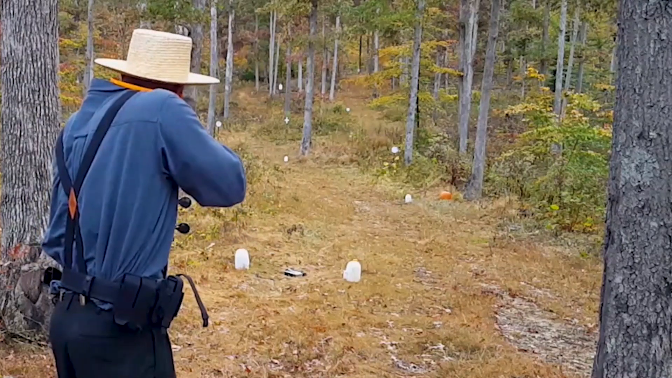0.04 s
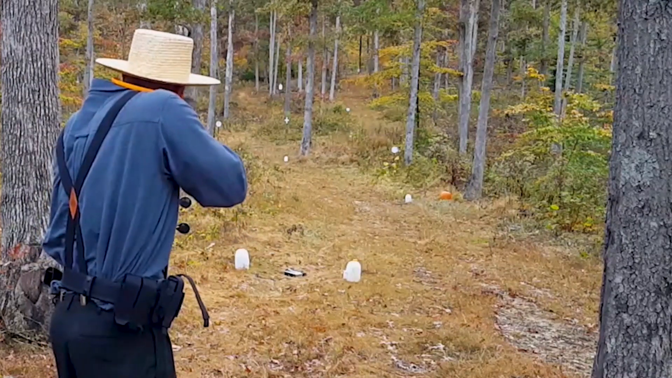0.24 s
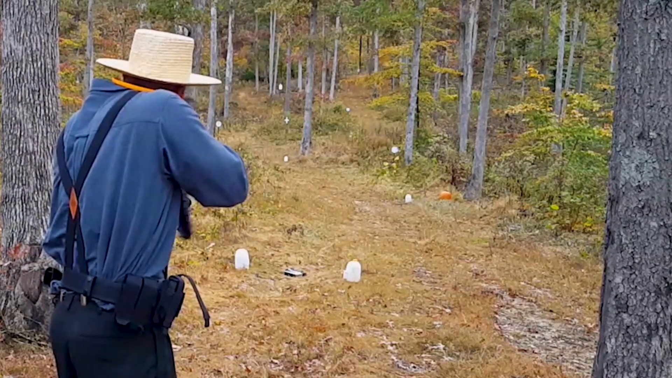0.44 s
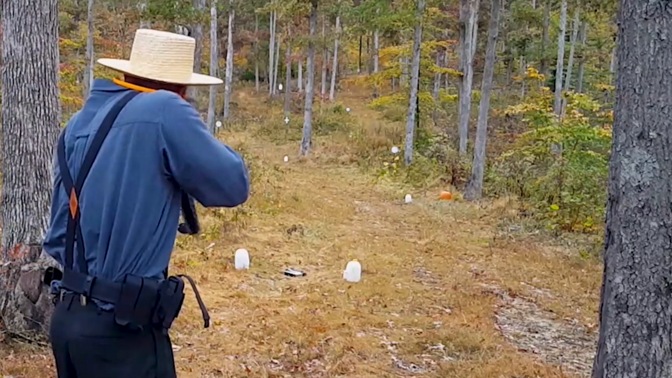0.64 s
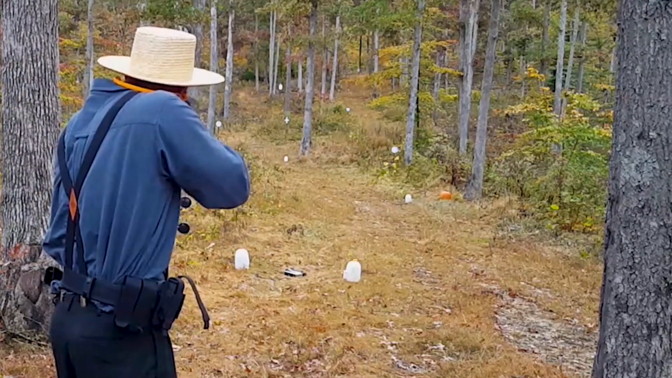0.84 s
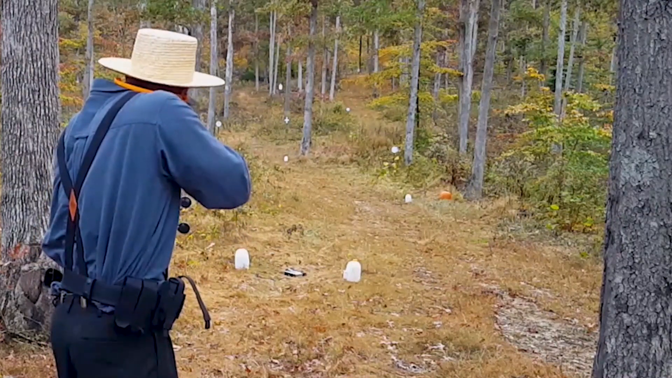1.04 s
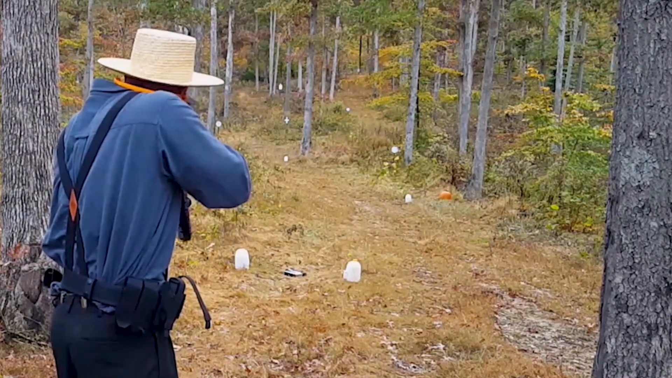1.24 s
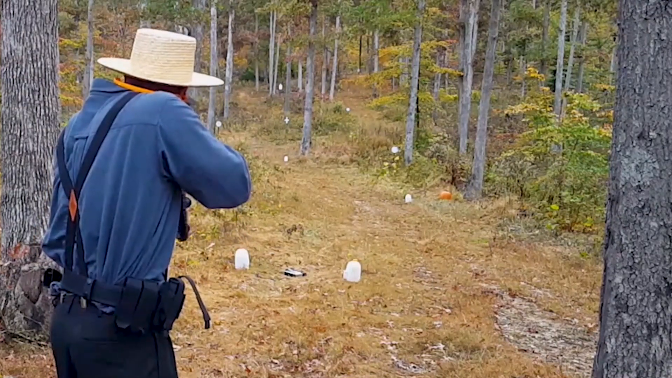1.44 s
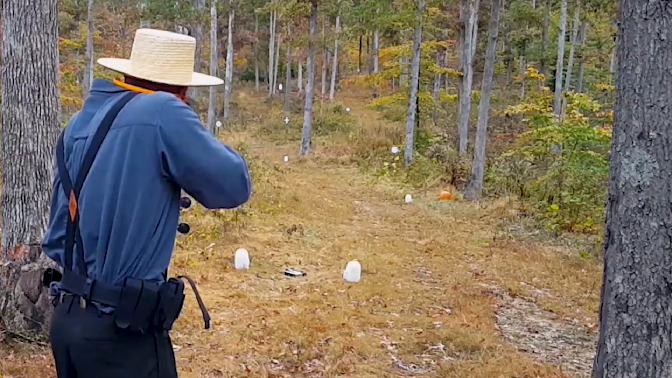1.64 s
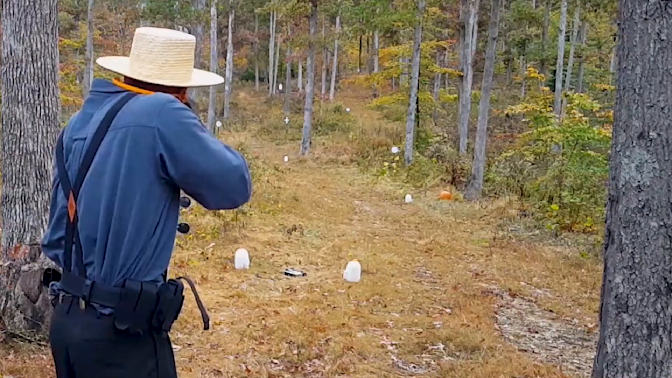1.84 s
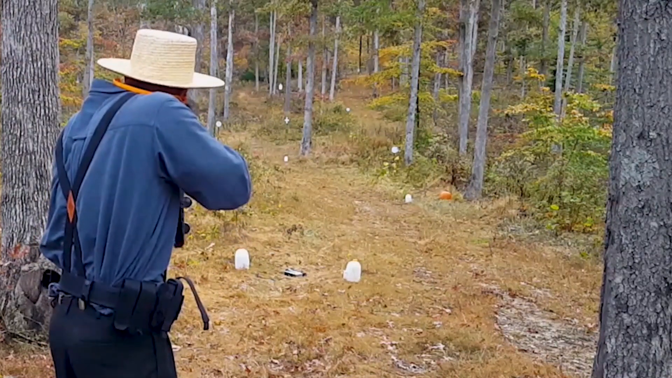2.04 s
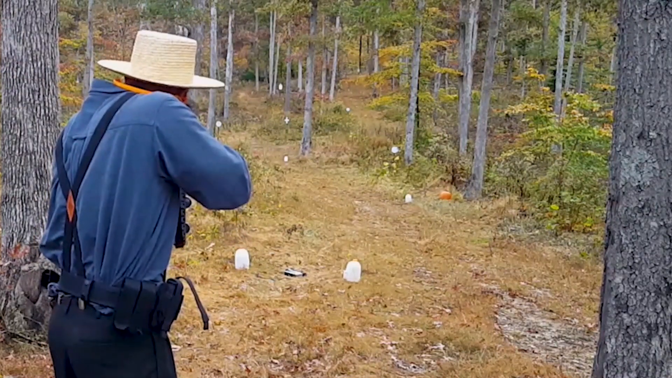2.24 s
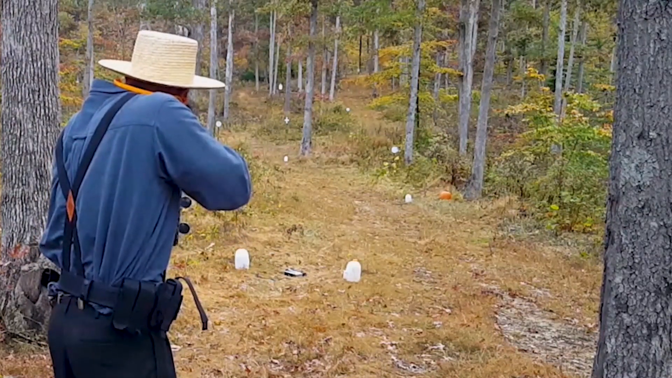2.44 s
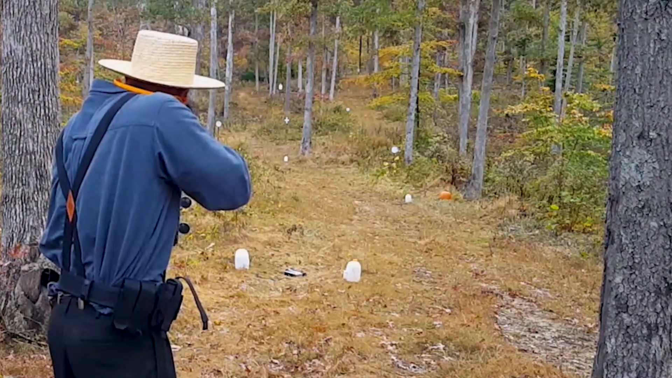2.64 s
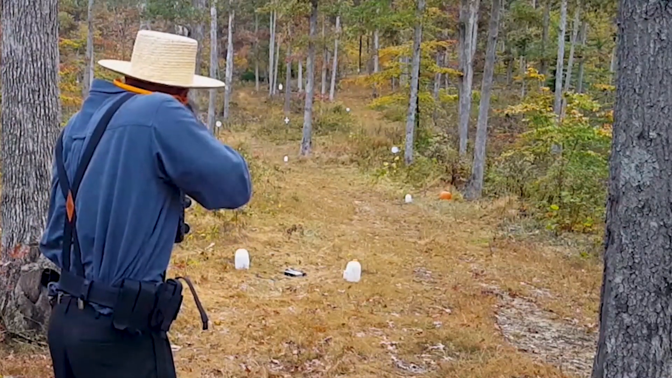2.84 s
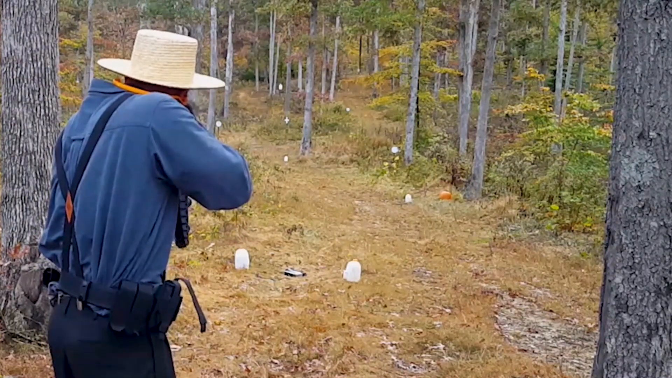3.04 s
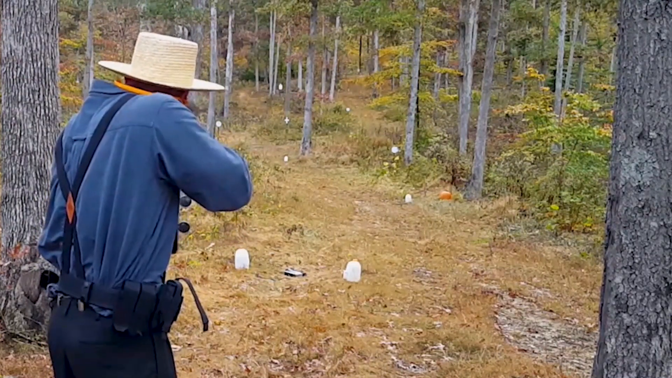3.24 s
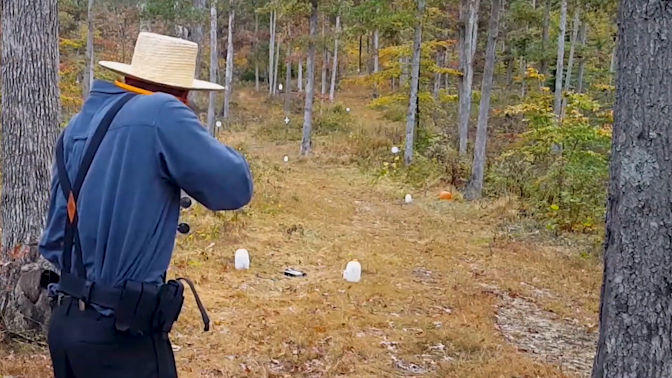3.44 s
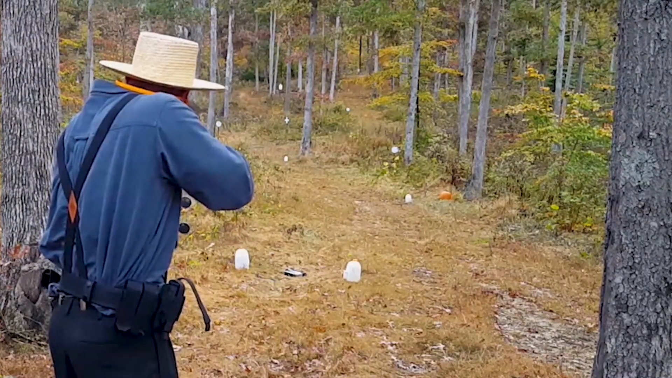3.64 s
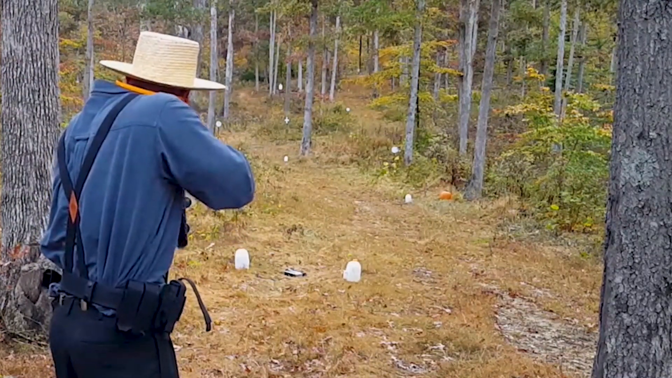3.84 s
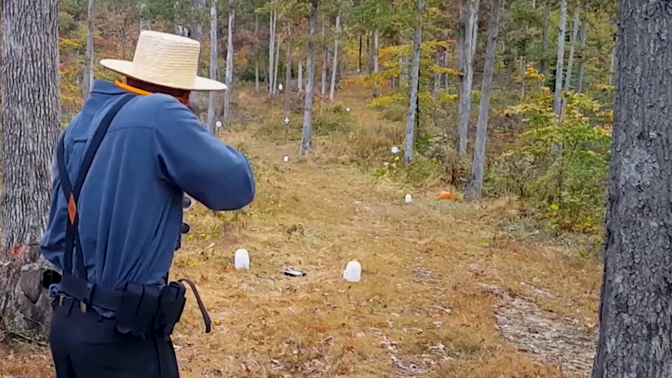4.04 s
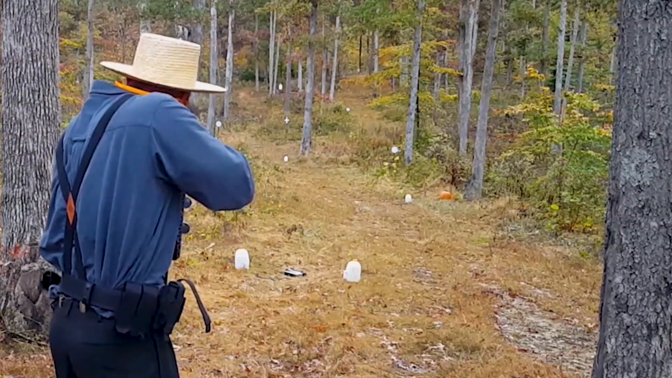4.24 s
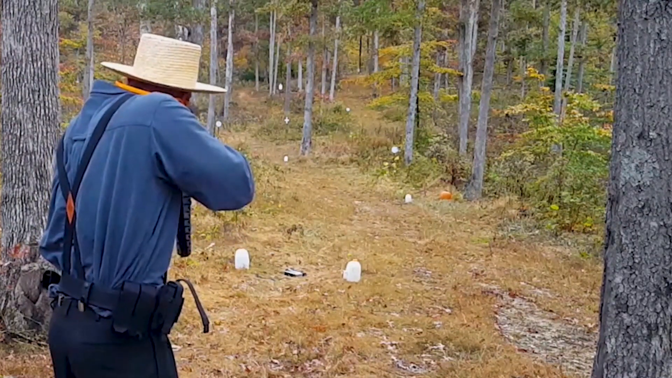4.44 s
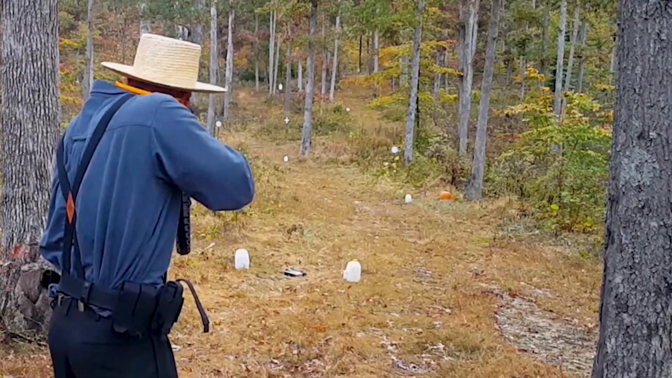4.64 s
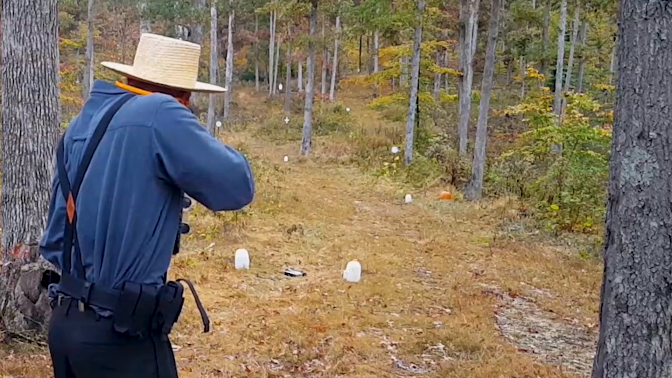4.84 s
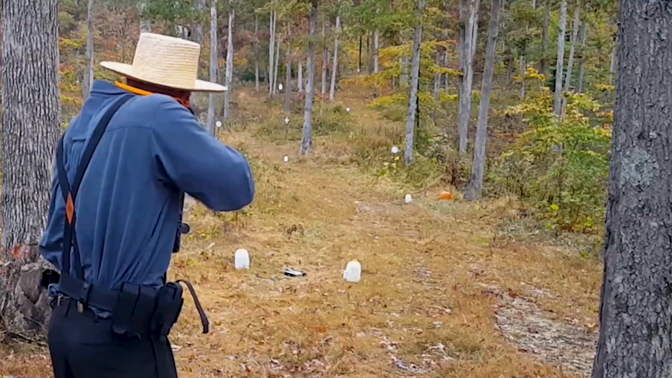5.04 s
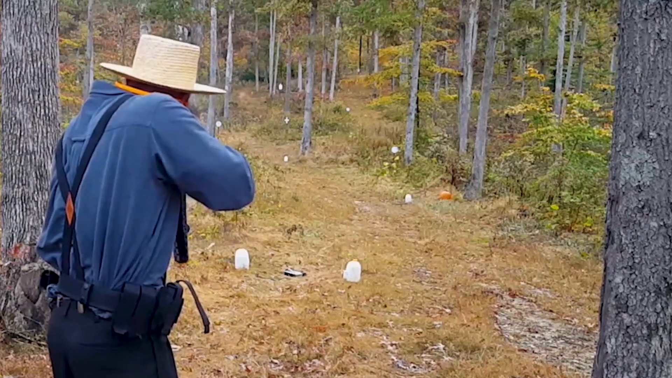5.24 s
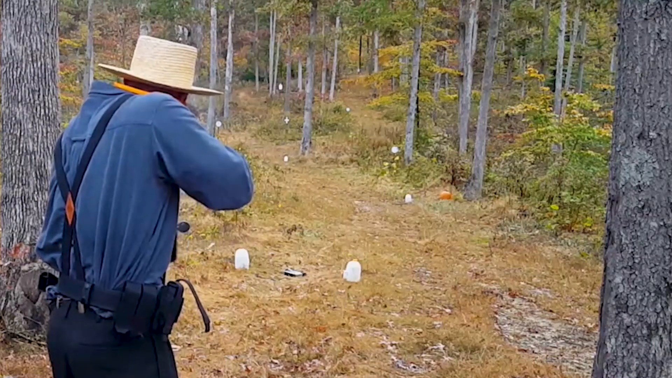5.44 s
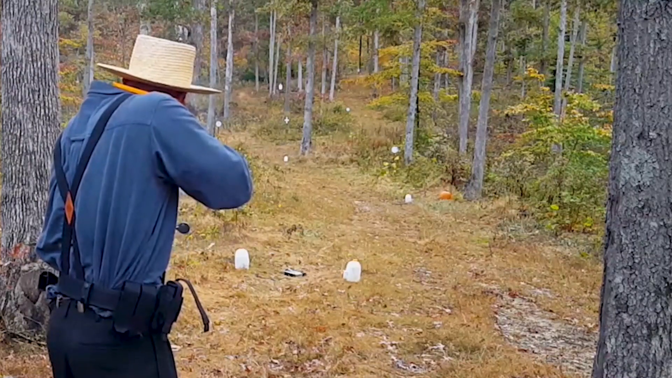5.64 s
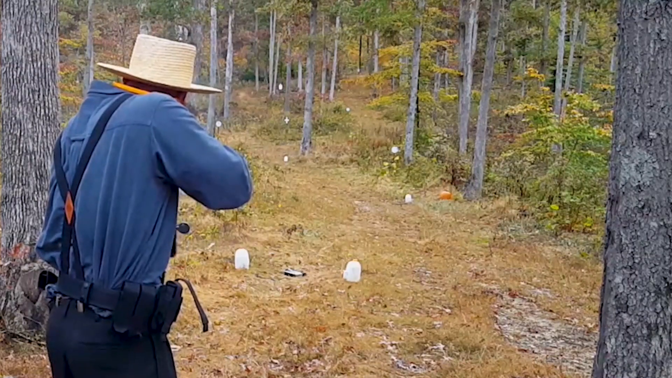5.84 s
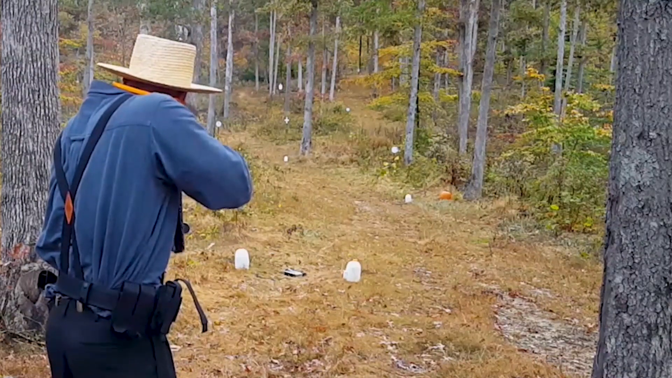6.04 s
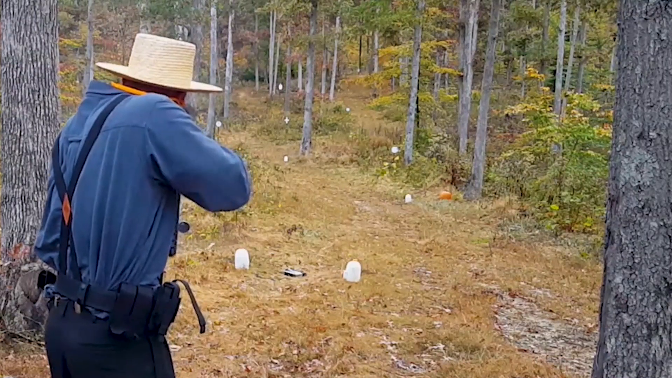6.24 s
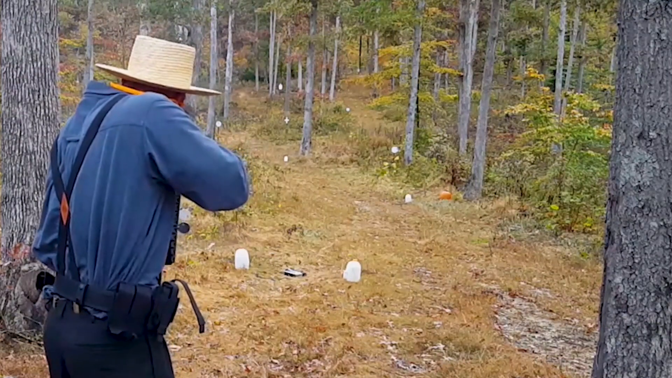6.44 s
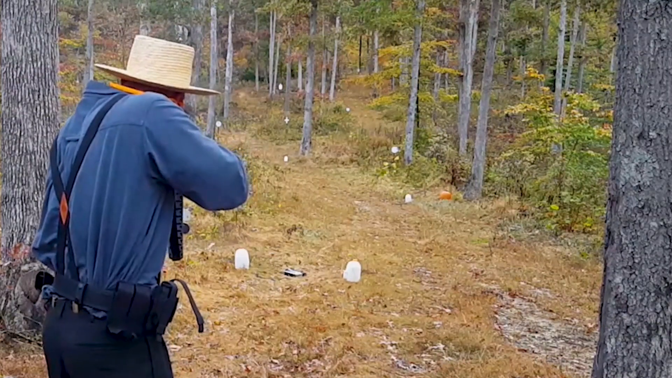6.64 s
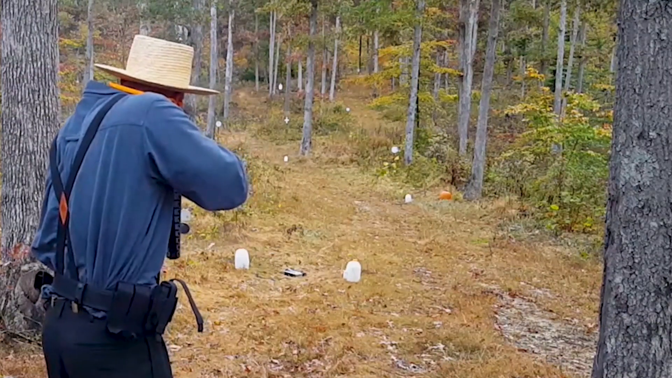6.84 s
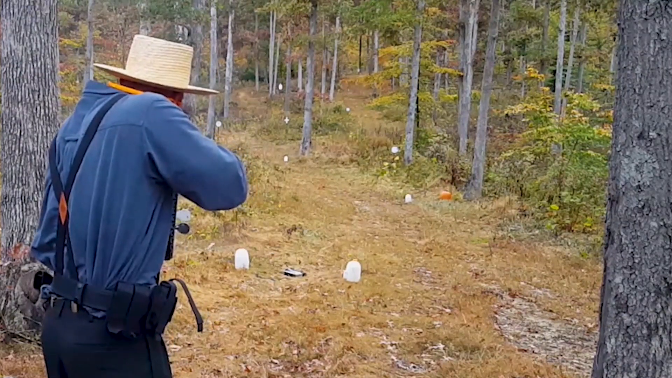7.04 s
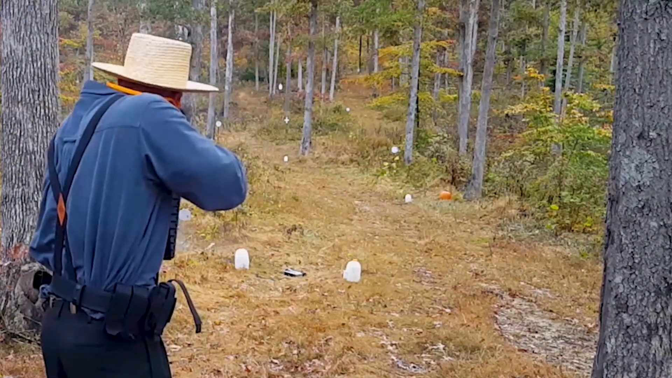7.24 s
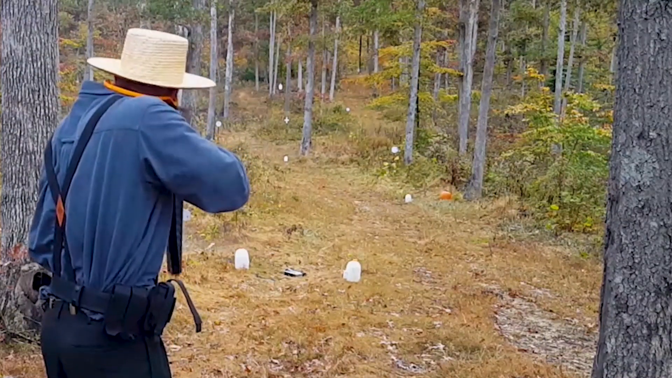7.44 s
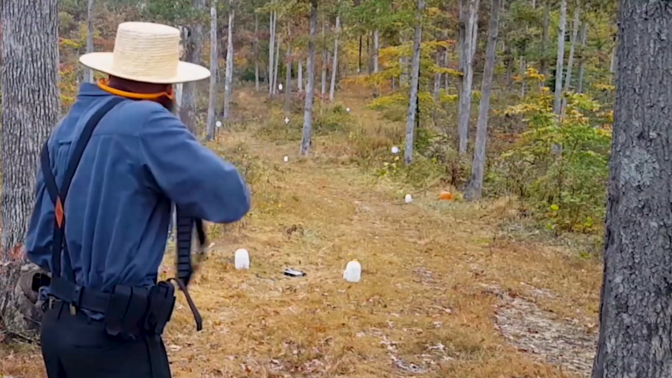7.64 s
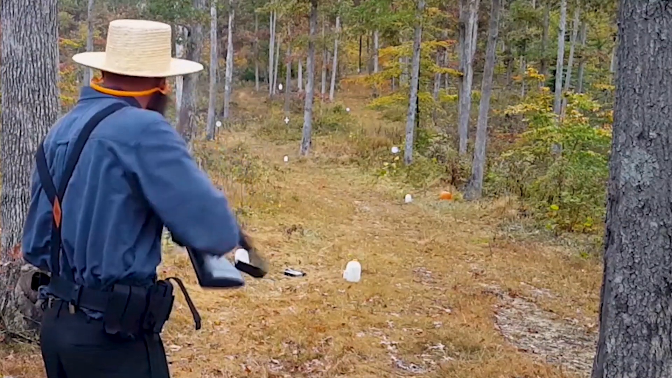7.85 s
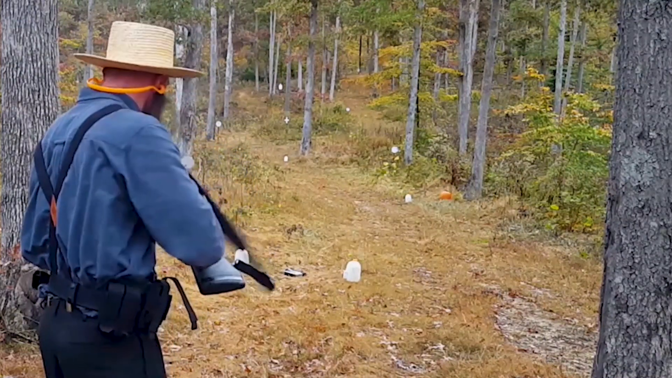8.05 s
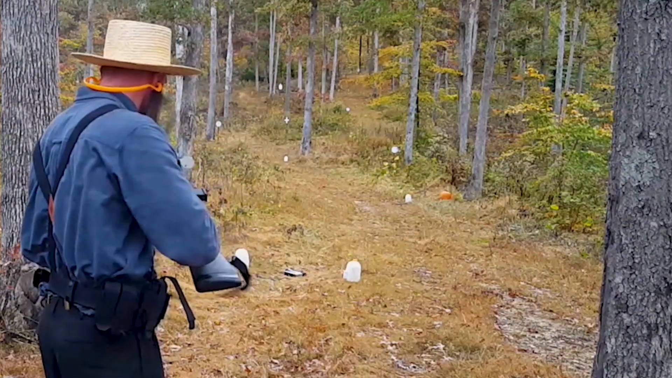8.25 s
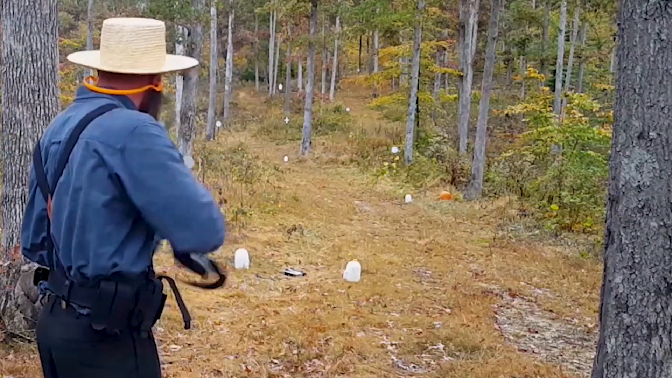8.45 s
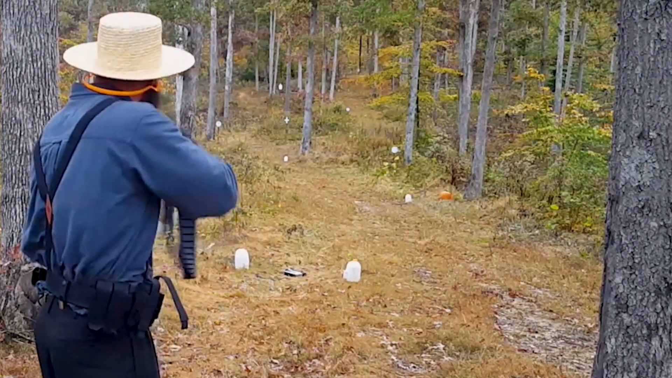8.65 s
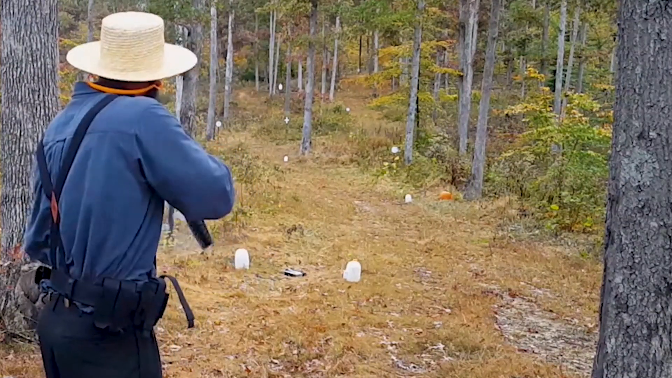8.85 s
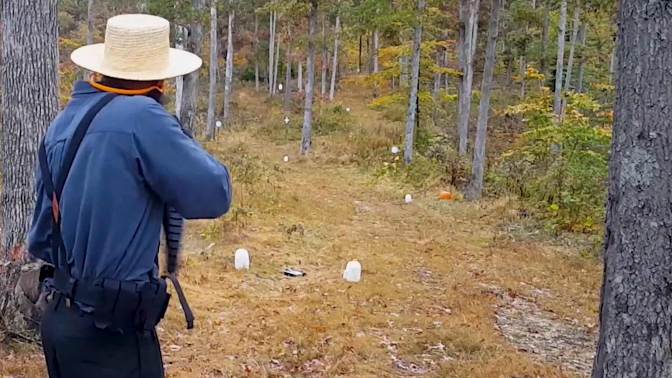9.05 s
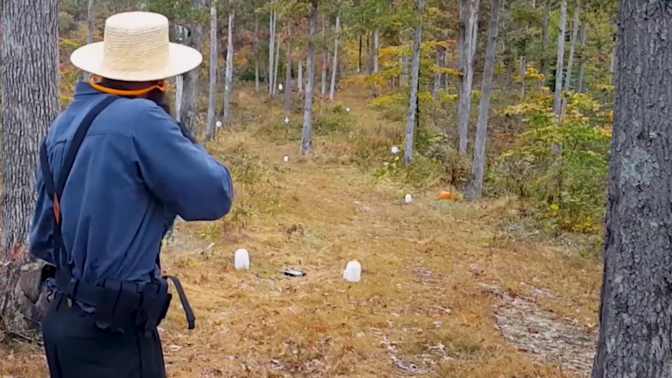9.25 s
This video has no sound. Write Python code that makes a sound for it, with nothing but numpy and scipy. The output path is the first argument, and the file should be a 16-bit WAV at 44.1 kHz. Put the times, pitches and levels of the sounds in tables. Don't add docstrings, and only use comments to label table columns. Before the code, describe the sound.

A carbine fires seven sharp shots about a second apart outdoors, with woodland echoes, tinkling ejected cases, faint breeze and sparse bird calls.

```python
import sys
import numpy as np
from scipy import signal
from scipy.fft import irfft, next_fast_len
from scipy.io import wavfile

SR = 44100
rng = np.random.default_rng(int(sys.argv[2]) if len(sys.argv) > 2 else 0)


def to_wav(s):
    ch = np.atleast_2d(s).T
    pcm = np.round(np.clip(ch, -1, 1) * 32767)
    wavfile.write(sys.argv[1], SR, pcm.astype(np.int16))


def linear_from_db(decibels):
    return 10 ** (np.asarray(decibels, float) / 20)


N = 410130
STEP = 21

# t/s, charge level/dB, level of the nearby slaps/dB
SHOTS = [
    (0.683, -1, 0),
    (1.7338, -3, -1.5),
    (2.8691, -3, -1.5),
    (3.8949, -2.5, -3),
    (4.994, -2.5, -4),
    (6.088, -3.5, -1),
    (7.147, -2.5, -3),
]
# f/Hz, level/dB, t60/s
BLAST_MODES = [(100, -28.5, .1), (155, -17.5, 0.1), (238, -20.5, 0.081), (571, -24.5, 0.14),
               (615, -17, 0.17), (1115, -15.5, 0.069), (1477, -13.5, 0.075), (2104, -15, 0.026)]
# t after the shot/s, level/dB
BLAST_ARRIVALS = [
    (0, -25.5),
    (.0017, -20),
    (.0028, -5),
    (.0045, -6),
    (.007, -9),
    (.0095, -16),
    (.012, -9),
]
# t after the shot/s, peak level/dB, left minus right/dB, centre f/Hz
TRUNK_SLAPS = [(0.0247, -20.5, -1.5, 919), (0.0567, -17, 1.5, 1620), (0.0755, -30, 3, 2600),
               (0.1195, -25.5, 3, 1820), (0.151, -25, -5, 1176), (0.204, -44.5, 3.5, 1460),
               (0.2403, -41, -13, 1190), (0.2640, -31, 5, 1250), (0.2877, -35, 3.5, 1310),
               (0.3266, -35, 5, 1160), (0.4075, -39, -1.5, 1200), (0.4508, -43, 1, 1285),
               (0.5315, -46.5, -3, 1150), (0.6323, -52, -9, 1210), (0.696, -47.5, 3, 1170)]
# f/Hz, early level/dB, early t60/s, late level/dB
WOOD_BANDS = [(45, -47, 0.11, -87), (88.5, -33.5, 0.069, -90.5), (188, -39, 0.24, -62),
              (353.5, -27.5, .25, -56.5), (622, -24, 0.2, -45.5), (850, -40.5, 0.083, -81),
              (1110, -27, 0.19, -42), (1620, -21.5, 0.1, -39), (2320, -23.5, 0.6, -39.5),
              (3630, -28, 0.6, -42.5), (5340, -31, 0.63, -45), (6940, -28.5, 0.53, -46.5),
              (10500, -39.5, 0.5, -67), (12800, -34.5, 0.54, -61.5), (15600, -31, 0.31, -86)]
# f/Hz, level/dB
ROLL_COLOUR = [(35, -74), (60, -32), (139, -20.5), (227, -11.5), (309, -9), (515, -6), (687, 0.5),
               (897, -7.5), (1140, 1.5), (1370, -7.5), (2330, -12), (5400, -34.5), (12000, -61),
               (15600, -89.5), (22000, -120)]
# t/s, ring level/dB, spin f/Hz, bolt clack level/dB
EJECTIONS = [
    (1.788, -2.5, 24, -26),
    (2.924, -4, 13.3, -21),
    (3.951, 1.5, 14.3, -20.5),
    (5.052, -1.5, 14.8, -23.5),
    (6.144, -8.5, 31, -32),
    (7.204, 0.5, 23, -25.5),
]
CASE_HZ = [
    (3219, 4242, 7568, 7870, 8430, 13012, 13901),
    (3066, 4231, 7342, 7885, 8308, 12322, 13817),
    (3055, 5406, 7320, 7820, 8248, 12258, 12792),
    (7494, 8033, 8470, 12586, 13164, 14060),
    (7695, 7932, 8355, 12993, 13895),
    (7520, 7790, 8335, 12375, 12912, 13795),
]
# level/dB, t60/s, left minus right/dB
CASE_2 = [(-35.5, 0.39, 0), (-37, 0.51, -3.5), (-39, 0.4, -10), (-42, 0.46, -6), (-37.5, .5, -6),
          (-40, 0.4, -10), (-36, 0.24, -9.5)]
CASE_3 = [(-38, 0.46, -3.5), (-55.5, 0.9, -6.5), (-49, 0.4, -19), (-39.5, 0.47, -22.5),
          (-34.5, 0.45, -14.5), (-43, .7, 5.5), (-34.5, 0.33, -10)]
CASE_4 = [(-43, 0.27, -11), (-42.5, 0.49, -4), (-44.5, 0.4, -20.5), (-45, 0.58, -2), (-44.5, 0.69, -16),
          (-45.5, 0.8, 6), (-44, .42, -2)]
CASE_5 = [(-43.5, 0.53, -14.5), (-28, 0.47, -14), (-36.5, 0.34, -10.5), (-42, 0.39, -10.5),
          (-42.5, 0.55, -7.5), (-54, .3, -15)]
CASE_6 = [(-30.5, 0.34, 2), (-26, 0.34, -13.5), (-38, 0.7, -10), (-38.5, 0.47, 9.5), (-39.5, 0.4, -11.5)]
CASE_7 = [(-44, 0.26, -14.5), (-39.5, 0.29, -3), (-44.5, 0.61, -6), (-39, 0.34, -10), (-43, 0.57, -3),
          (-49, .34, -9)]
# t/s, peak level/dB, centre f/Hz, left minus right/dB
TICKS = [(0.0473, -53.5, 7650, -2), (1.6794, -68, 4870, -3.0), (2.4596, -67, 5640, -5),
         (3.8392, -61, 4540, 0.0), (4.7596, -62, 4830, -2), (4.827, -61, 4700, -2.5),
         (5.847, -54.5, 4970, -4.5), (5.9097, -65, 4600, -4), (6.052, -42, 4520, -3.5),
         (6.9476, -71, 7110, -3.0), (8.2994, -73, 5000, -5), (8.705, -73, 4600, -10),
         (8.8842, -68, 5710, -7), (8.935, -64, 4760, -8)]
# t/s, length/s, level/dB, rasp level/dB, second partial level/dB
SCOLDS = [
    (2.575, .21, -77.5, 21.5, 2),
    (3.833, 0.12, -70.5, 16.5, 6),
    (7.046, .11, -62, 4.5, 1),
    (8.378, .19, -69, 8, -13),
]
# f/Hz, level/dB
SCOLD_BEAK = [(1400, 3), (2900, 5.5), (4350, 0), (5000, -6.5), (5800, -7), (6600, -4.5), (7300, -6),
              (8700, -14), (10200, -28.5), (13000, -39)]
# t/s, length/s, start f/Hz, end f/Hz, level/dB
WHISTLES = [
    (2.58, .065, 2950, 2350, -51.5),
    (3.58, 0.25, 3300, 3800, -69),
    (8.725, 0.25, 3580, 4114, -63.5),
]
WHISTLE_ECHO_DB = [-15, 0, 0]
# f/Hz, level per Hz/dB
LEAVES_COLOUR = [(18, -48.5), (30, -14.5), (75, -13), (116, -31.5), (139, -10.5), (167, -2.5), (228, -28.5),
                 (415, -36), (837, -18.5), (1030, -26.5), (6040, -33.5), (7430, -33), (15000, -69.5)]
# f/Hz, level per Hz/dB
GUST_COLOUR = [(120, -31.5), (200, -6), (236, -11), (293, -16), (618, -18), (3360, -23), (4180, -28),
               (5390, -28), (10800, -38.5), (15500, -31)]

CEILING, TOP_HZ = .21, 15800
LATE_T60_S, LATE_HALF_HZ = 2.27, 6500
ALIKE_LOW, ALIKE_HIGH, ALIKE_HZ = 1, 0.063, 740
DUCK_DB, DUCK_RELEASE_S, DUCK_REST_DB = -3.5, 0.24, 0.5
MURMUR_S, MURMUR_DB = .5, -55
ROLL_S, ROLL_RISE_S, ROLL_HOLD_S, ROLL_DB = 0.7, .18, 0.29, -45.5
ROLL_FALL_DB_S, ROLL_TREBLE_FALL_DB_S = 13, 10.5
BRASS_SPLIT_HZ = 13
LINGER_DB, LINGER_DB_KHZ, LINGER_TIMES = 4, 6, 4
SPIN_SWAY = .6
SCOLD_HZ, SCOLD_SAG_HZ_S = 1455, 60
WHISTLE_ATTACK, WHISTLE_GLIDE, WHISTLE_RASP = .22, .65, .4
GUST_END_S, GUST_DB = 0.384, -63
BUFFET_DB, BUFFET_DIES_DB_S, BUFFET_REST_DB = -62.5, 35, -78.5
THUD_S, THUD_DB, THUD_HZ = .25, -39, 42
LEAVES_DB, HUM_DB, HUM_RISE_DB_S = -69.5, -81.5, 1.5


def rifle():
    out, length = np.zeros((2, N)), int(1.3 * SR)
    duck = linear_from_db(DUCK_REST_DB + DUCK_DB * np.exp(-np.arange(length) / SR / DUCK_RELEASE_S))
    phase = np.array([[.4], [-.4]])
    body = ring(BLAST_MODES, 8820, phase) * linear_from_db(np.array([[-1.5], [1.5]]))
    stands = rng.standard_normal((len(TRUNK_SLAPS), 3, 4))
    trunks = rng.standard_normal((240, 4))
    for s, db, slap_db in SHOTS:
        shifted_stands = stands + .35 * rng.standard_normal(stands.shape)
        shifted_trunks = trunks + .35 * rng.standard_normal(trunks.shape)
        echoes = linear_from_db(slap_db) * slaps(length, shifted_stands, shifted_trunks)
        add(out, s, linear_from_db(db) * blast(body))
        add(out, s, linear_from_db(db) * duck * (echoes + wood(length)))
        add(out, s, linear_from_db(db) * roll(int(2.2 * SR)))
    return out


def blast(body):
    out, t = np.zeros((2, SR)), np.arange(len(body[0])) / SR
    surge = 1 + 1.5 * np.exp(-t / .002)
    for lag, db in BLAST_ARRIVALS:
        crack = linear_from_db(-4.5) * spread(noise(len(t), band(1700, 1.4)), 0.1) * linear_from_db(-60 * t / 0.0094)
        thump = linear_from_db(-15.5) * noise(len(t), band(140, 2.2)) * linear_from_db(-60 * t / 0.11)
        add(out, lag, linear_from_db(db) * (surge * body + crack + thump))
    return out[:, :len(t)]


def slaps(length, stands, trunks):
    out = np.zeros((2, length))
    triple = ((0, 9.7, 0.48), (.0017, 5.1, 1.22), (.0038, 2.1, 1.4))  # delay/s, level/dB, turns
    for (lag, db, pan_db, hz), stand in zip(TRUNK_SLAPS, stands):
        for (step, step_db, turns), (jitter, glide, sway, phase) in zip(triple, stand):
            start = lag - 150 / SR + step + 0.00047 * jitter
            slap = linear_from_db(db + step_db) * wavelet(hz * linear_from_db(2.3 * glide), turns, 2 * phase)
            add(out, start, slap, pan_db + 3 * sway)
    for place, (size, pitch, side, phase) in zip(np.linspace(0, 1, len(trunks)), trunks):
        db = -29 - 42 * place + 3 * np.clip(size, -2, 1.5)
        slap = linear_from_db(db) * wavelet(1050 * 2 ** (.55 * pitch), 1.12, 2 * phase)
        add(out, .022 + 0.72 * place + .004 * side, slap, 4 * side)
    return out[:, :length]


def wavelet(hz, turns, phase):
    t = np.arange(-150, 150) / SR
    return np.sin(2 * np.pi * hz * t + phase) * np.exp(-.5 * (t * hz / turns) ** 2)


def wood(length):
    t, out = np.arange(length // STEP + 1) * STEP / SR, 0
    lumps = flicker(length, 45, 1.)[0]
    for hz, early_db, early_t60, late_db in WOOD_BANDS:
        early = linear_from_db(early_db - 60 * t / early_t60)
        late = linear_from_db(late_db - 60 * t * (1 + hz / LATE_HALF_HZ) / LATE_T60_S)
        lean_db = -2.5 * np.clip(np.log2(hz / 2500), 0, 1)
        own_lumps = min(3000 / hz, 2.5) * flicker(length, 25, 1.)[0]
        fade = np.hypot(early, late) * linear_from_db(1.61 * lumps + own_lumps)
        likeness = ALIKE_HIGH + (ALIKE_LOW - ALIKE_HIGH) / (1 + (hz / ALIKE_HZ) ** 8)
        lean = linear_from_db(np.array([[lean_db], [-lean_db]]) / 2)
        out = out + smooth(fade, length) * lean * spread(noise(length, band(hz, 0.3)), likeness)
    return out * np.clip(np.arange(length) / SR / 0.0041, 0, 1)


def roll(length):
    t = np.arange(length // STEP + 1) * STEP / SR
    times = [MURMUR_S, ROLL_S, ROLL_S + ROLL_RISE_S]
    db = np.interp(t, times, [MURMUR_DB, MURMUR_DB, ROLL_DB], left=-120)
    past = np.maximum(t - ROLL_S - ROLL_RISE_S - ROLL_HOLD_S, 0)
    mottles = 2.1 * flicker(length, 9, 1.2)
    treble_fall = ROLL_FALL_DB_S + ROLL_TREBLE_FALL_DB_S
    low = smooth(linear_from_db(db - ROLL_FALL_DB_S * past + mottles[0]), length)
    high = smooth(linear_from_db(db - treble_fall * past + mottles[1]), length)
    far = spread(noise(length, colour(ROLL_COLOUR)), 0.22)
    bass = signal.sosfilt(signal.butter(1, 900, fs=SR, output="sos"), far)
    return low * bass + high * (far - bass)


def cases():
    out, t = np.zeros((2, N)), np.arange(SR) / SR
    slow = np.arange(SR // STEP + 1) * STEP / SR
    tubes = (CASE_2, CASE_3, CASE_4, CASE_5, CASE_6, CASE_7)
    for (s, db, spin_hz, clack_db), pitches, modes in zip(EJECTIONS, CASE_HZ, tubes):
        bolt_slam = spread(noise(2048, band(2000, 1.5)), 0.36)
        add(out, s, linear_from_db(clack_db - 60 * t[:2048] / 0.028) * bolt_slam)
        for hz, (mode_db, t60, pan_db) in zip(pitches, modes):
            turns = spin_hz * slow * rng.uniform(.8, 1.2) + rng.random((2, 1))
            facing = 1 + .45 * np.cos(2 * np.pi * turns)
            rough = linear_from_db(2.5 * flicker(SR, 40, 1.2))
            linger_db = LINGER_DB - LINGER_DB_KHZ * hz / 1000
            fade = linear_from_db(mode_db - 60 * slow / t60)
            fade = fade + linear_from_db(mode_db + linger_db - 60 * slow / t60 / LINGER_TIMES)
            level = np.array([smooth(port, SR) for port in fade * facing * rough])
            sway = SPIN_SWAY * hz / 1e4 * np.sin(2 * np.pi * spin_hz * t)
            twin_hz = hz + BRASS_SPLIT_HZ * rng.standard_normal()
            tone = np.sin(2 * np.pi * hz * t + sway) + 0.36 * np.sin(2 * np.pi * twin_hz * t)
            add(out, s, linear_from_db(db) * level * tone, pan_db)
    return out


def ticks():
    out, t = np.zeros((2, N)), np.arange(900) / SR
    for s, db, hz, pan_db in TICKS:
        snap = spread(noise(len(t), band(hz, 0.38)), 0.29) * np.exp(-t / 0.0022)
        add(out, s, linear_from_db(db + 1.5) * snap, pan_db)
    return out


def birds():
    out = np.zeros((2, N))
    scolds(out)
    whistles(out)
    return out


def scolds(out):
    beak = colour(SCOLD_BEAK)
    for s, length, db, rasp_db, second_db in SCOLDS:
        t = np.arange(int(length * SR)) / SR
        hz = (SCOLD_HZ - SCOLD_SAG_HZ_S * t) * (1 + .012 * noise(len(t), band(60, 1.))[0])
        angle = 2 * np.pi * np.cumsum(hz) / SR
        stack = 0
        for k in range(1, 9):
            partial_db = second_db * (k == 2) - 2.5 * max(k - 3, 0)
            stack = stack + beak(k * SCOLD_HZ) * linear_from_db(partial_db) * np.sin(k * angle)
        shape = np.clip(np.minimum(t / 0.0016, (length - t) / 0.028), 0, 1) * np.exp(-t / 0.18)
        add(out, s, linear_from_db(db) * shape * (stack + linear_from_db(rasp_db) * noise(len(t), beak)))


def whistles(out):
    trees = rng.standard_normal((2, SR)) * linear_from_db(-29.5 - 60 * np.arange(SR) / SR / 1.3)
    for (s, length, start_hz, end_hz, db), echo_db in zip(WHISTLES, WHISTLE_ECHO_DB):
        part = np.linspace(0, 1, int(length * SR))
        glide = (1 - np.exp(-part / WHISTLE_GLIDE)) / (1 - np.exp(-1 / WHISTLE_GLIDE))
        hz = start_hz + (end_hz - start_hz) * glide
        flutter = 1 + WHISTLE_RASP * noise(len(part), band(250, .7))[0]
        shape = np.interp(part, [0, WHISTLE_ATTACK, .75, 1], [0.13, 1, 0.58, 0]) * flutter
        tone = linear_from_db(db) * shape * np.sin(2 * np.pi * np.cumsum(hz) / SR)
        add(out, s, linear_from_db(-5) * tone[None])
        add(out, s, linear_from_db(echo_db) * signal.fftconvolve(tone[None], trees, axes=1))


def breeze():
    t = np.arange(N) / SR
    buffet_db = np.maximum(BUFFET_DB - BUFFET_DIES_DB_S * np.maximum(t - GUST_END_S, 0), BUFFET_REST_DB)
    throb_db = 1.5 * smooth(flicker(N, 12, 1.)[0], N)
    gust = linear_from_db(GUST_DB) * np.clip((GUST_END_S - t) / .01, 0, 1) * spread(noise(N, colour(GUST_COLOUR)), 0.074)
    leaves = linear_from_db(LEAVES_DB) * spread(noise(N, colour(LEAVES_COLOUR)), 0.25)
    buffet = linear_from_db(buffet_db + throb_db) * spread(noise(N, band(70, 1.26)), 0.49)
    hum = linear_from_db(HUM_DB + HUM_RISE_DB_S * t) * spread(noise(N, band(260, 0.99)), .7)
    out = gust + leaves + buffet + hum
    add(out, THUD_S, ring([(THUD_HZ, THUD_DB, .15)], SR // 4)[None])
    return out


def ring(modes, length, phase=0):
    t, out = np.arange(length) / SR, 0
    for hz, db, t60 in modes:
        out = out + linear_from_db(db) * np.sin(2 * np.pi * hz * t + phase) * linear_from_db(-60 * t / t60)
    return out


def noise(length, gain):
    size = next_fast_len(length)
    bins = rng.standard_normal((2, size // 2 + 1, 2)).view(complex)[..., 0]
    x = irfft(bins * gain(np.fft.rfftfreq(size, 1 / SR) + 1), size)[:, :length]
    return x / x.std()


def band(hz, octaves):
    return lambda f: np.exp(-.5 * (np.log2(f / hz) / octaves) ** 2)


def colour(points):
    hz, db = np.transpose(points)
    return lambda f: linear_from_db(np.interp(np.log(f), np.log(hz), db))


def spread(pair, likeness):
    c = np.clip(likeness, 0, 1)
    side = np.sqrt(1 - c) * pair[1] * np.array([[1], [-1]])
    return (np.sqrt(1 + c) * pair[0] + side) / np.sqrt(2)


def flicker(length, hz, octaves):
    return noise(length // STEP + 1, band(hz * STEP, octaves))


def smooth(control, length):
    return np.interp(np.arange(length) / STEP, np.arange(len(control)), control)


def add(out, s, x, pan_db=0):
    i = int(s * SR)
    x = x * linear_from_db(np.array([[pan_db], [-pan_db]]) / 2)
    out[:, i:i + x.shape[1]] += x[:, :N - i]


def scene():
    return rifle() + cases() + ticks() + birds() + breeze()


def band_limit(x):
    return signal.sosfilt(signal.butter(12, 17000, fs=SR, output="sos"), x)


def record(dry):
    x = signal.sosfilt(signal.butter(3, 65, "high", fs=SR, output="sos"), dry) / CEILING
    x = CEILING * x / (1 + x ** 4) ** .25
    x = signal.sosfilt(signal.ellip(8, .3, 60, TOP_HZ, fs=SR, output="sos"), x)
    x = signal.sosfilt(signal.butter(1, 45, "high", fs=SR, output="sos"), x)
    x = x + linear_from_db(-84.5) * spread(noise(N, band(32, 0.65)), .6)
    return band_limit(x)


dry = scene()
out = record(dry)
to_wav(out)
```